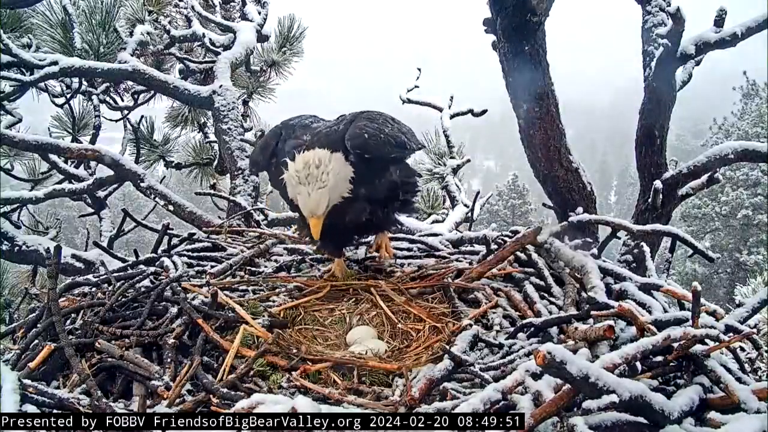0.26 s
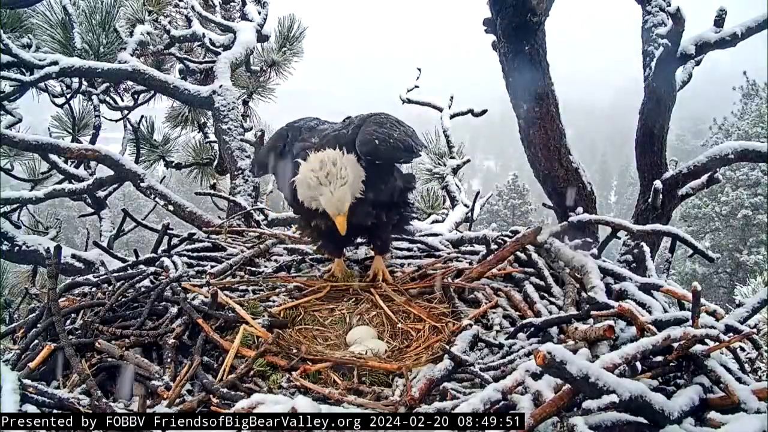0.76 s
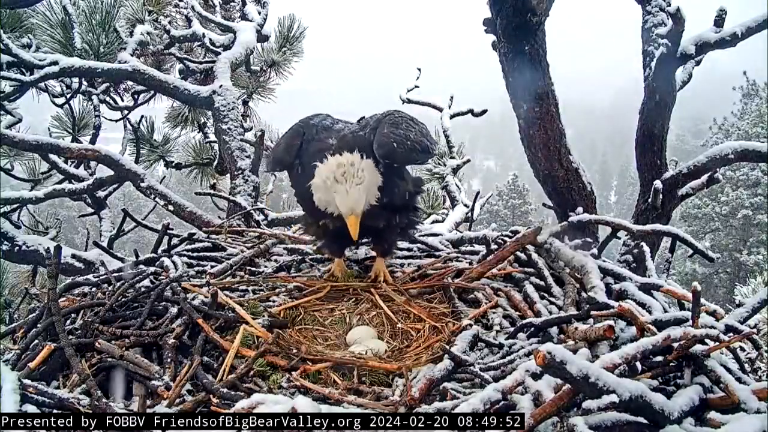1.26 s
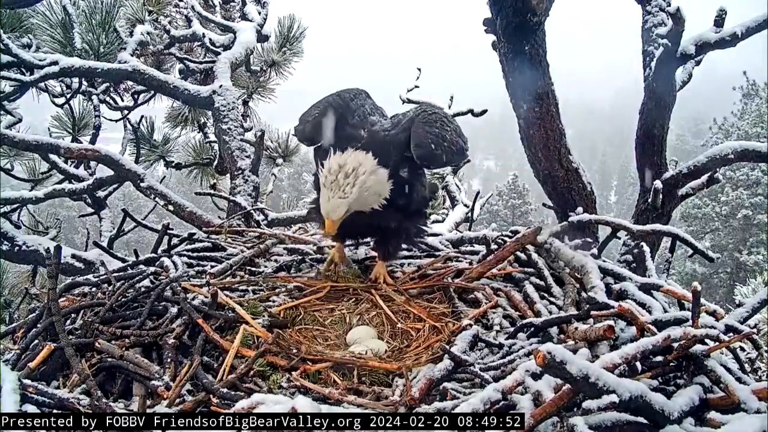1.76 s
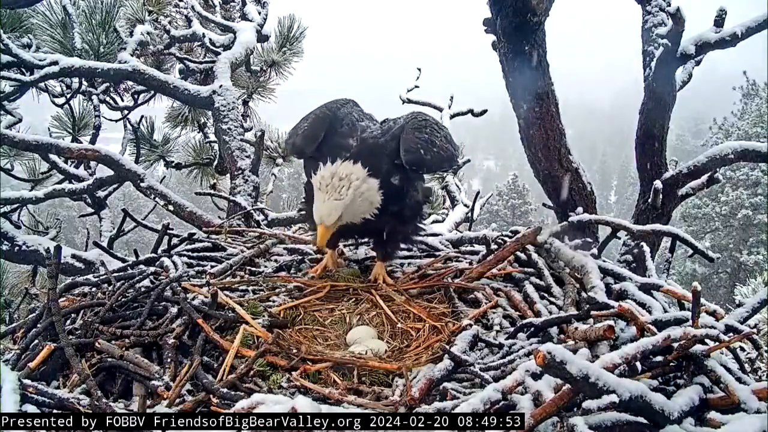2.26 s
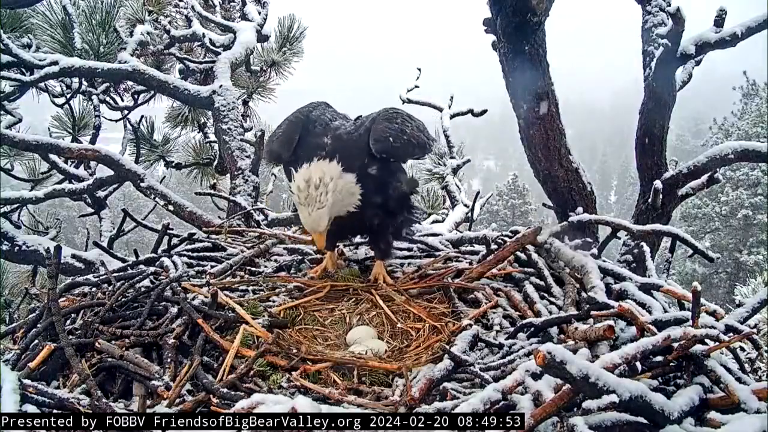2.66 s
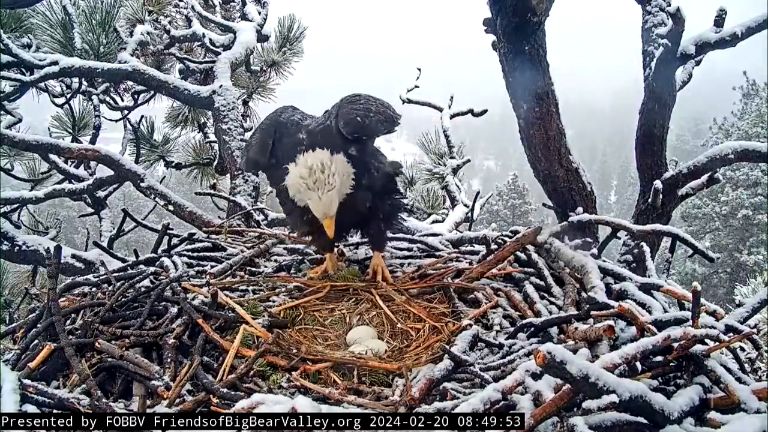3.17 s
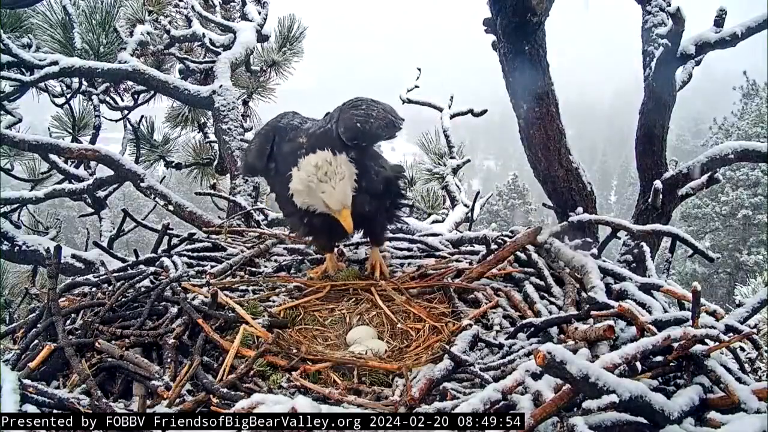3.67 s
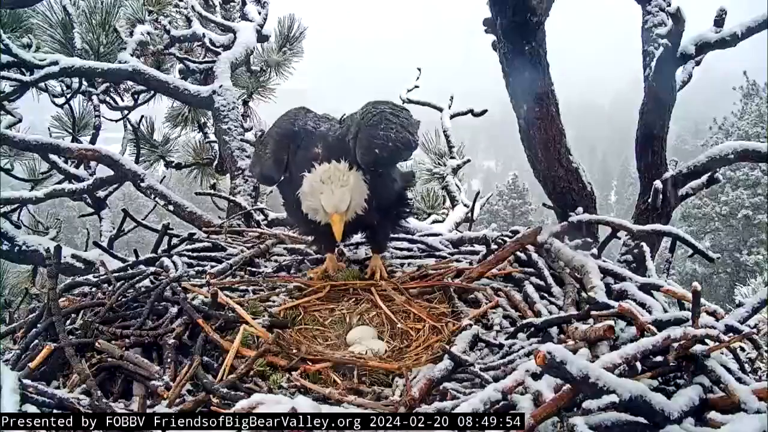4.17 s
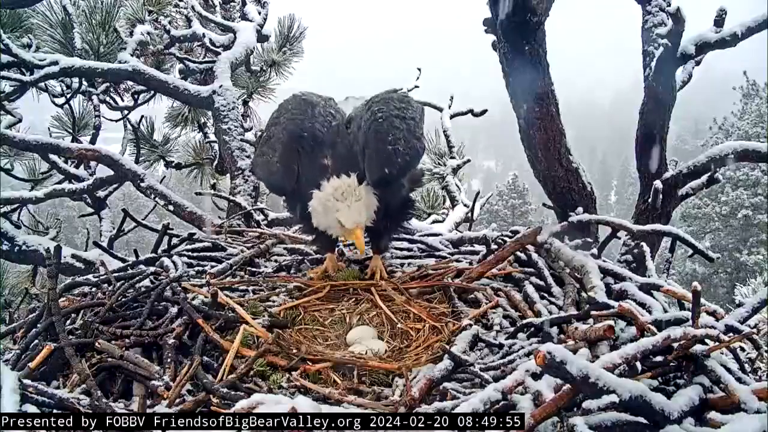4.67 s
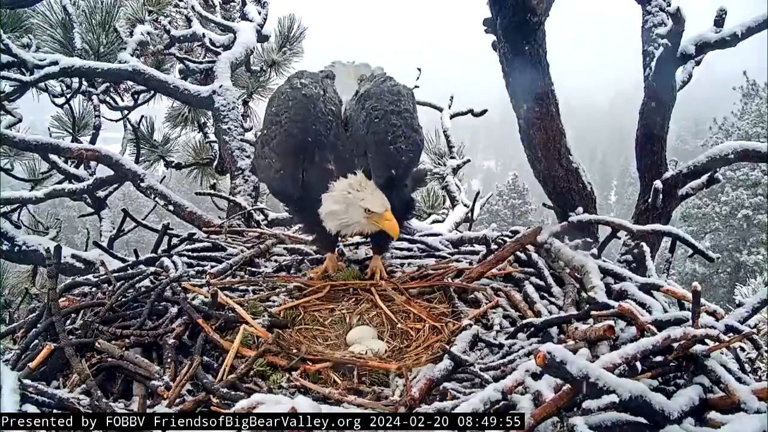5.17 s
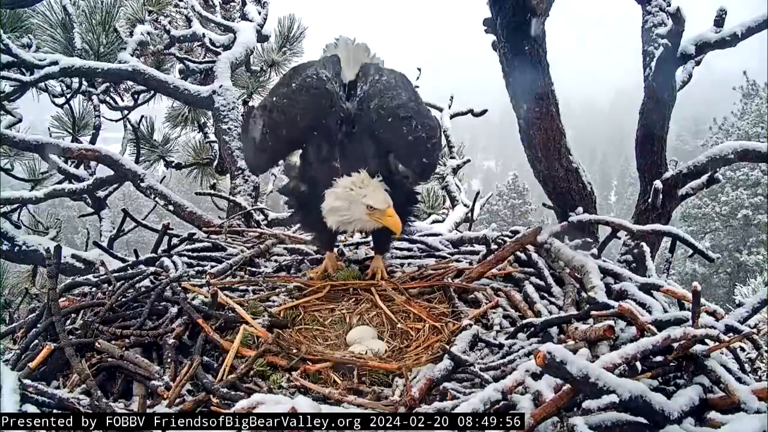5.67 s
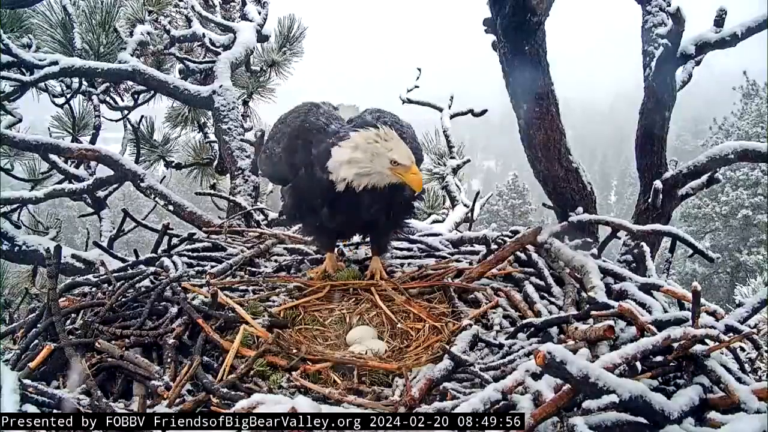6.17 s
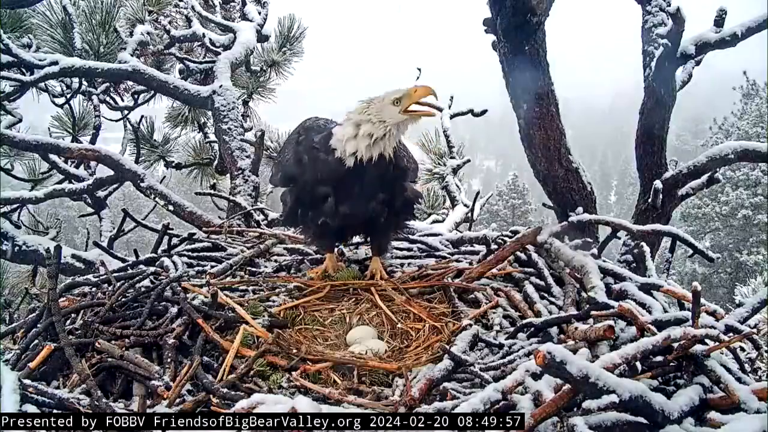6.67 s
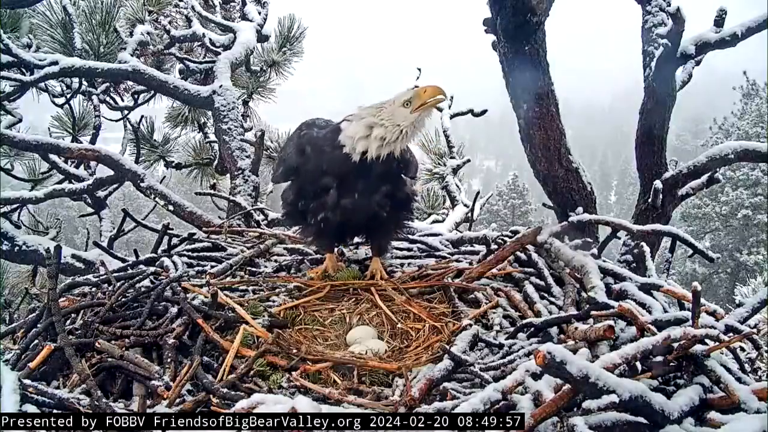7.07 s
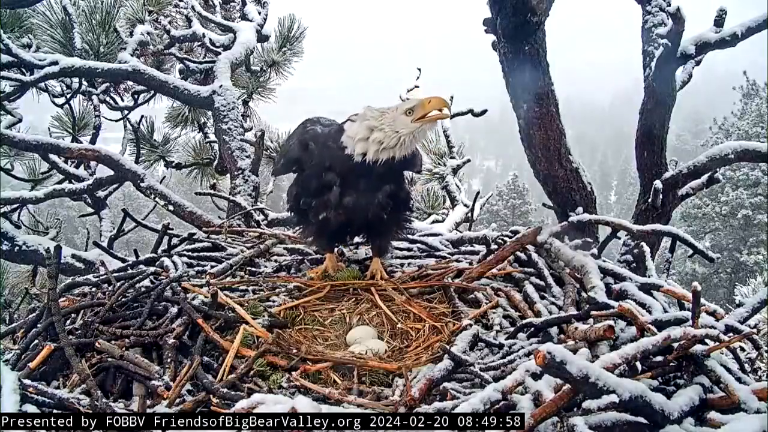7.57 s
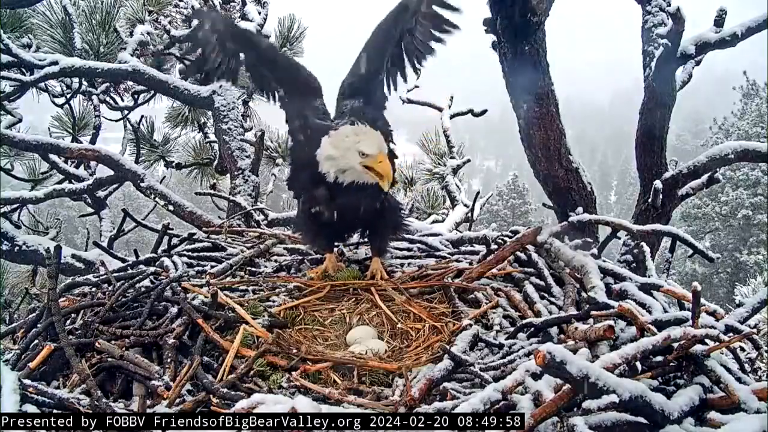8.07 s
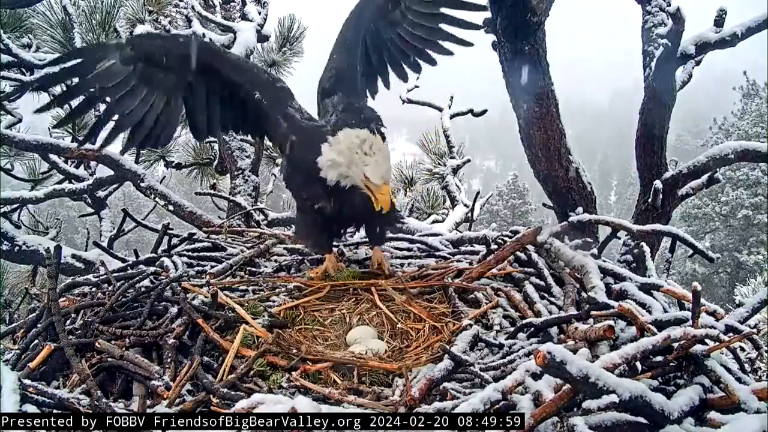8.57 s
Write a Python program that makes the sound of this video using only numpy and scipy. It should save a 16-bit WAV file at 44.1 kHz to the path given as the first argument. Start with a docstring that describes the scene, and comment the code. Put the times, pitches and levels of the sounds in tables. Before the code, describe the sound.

Over steady low wind rumble and hiss, a bald eagle gives faint chirps and a falling chitter, then bursts into harsh, cracking, overloaded yelps.

```python
"""On a nest in a snowy pine, a bald eagle gives thin chirps, a falling chitter and five loud, cracking yelps.
Its syrinx is a rough near-sine oscillator with strongly coloured overtones, and the forest answers by
scattering. Wind is coloured noise that rumbles, hisses and rushes, and twigs crunch as decaying bands of noise.
The yelps overload the nest microphone, whose gain control ducks the wind and lets it creep back."""
import sys
import numpy as np
from scipy import signal
from scipy.fft import rfft, irfft
from scipy.io import wavfile
from scipy.ndimage import uniform_filter1d, minimum_filter1d

SR = 44100
rng = np.random.default_rng(int(sys.argv[2]) if len(sys.argv) > 2 else 0)


def int16_out(signal):
    """Quantize to a 16-bit WAV file."""
    q = np.round(np.clip(np.atleast_2d(signal).T, -1, 1) * 32767)
    wavfile.write(sys.argv[1], SR, q.astype(np.int16))


N = 388516
TIME = np.arange(N) / SR  # s
AGE = np.arange(SR // 3) / SR  # time since the start of a note, s


def eagle():
    """Direct and scattered sound add: chirps carry much of the forest, whistle and yelps are nearly dry."""
    yelps = syrinx(forced_calls(), overtone_db=3.5, jitter=.065, buzz_hz=609, buzz_depth=1.05,
                   half_db=-1, fifth_db=-15, rasp_db=-3)
    chirps = syrinx(soft_calls(), overtone_db=-18, jitter=.062, buzz_hz=679, buzz_depth=1.3,
                    half_db=-11, fifth_db=-5, rasp_db=-4.5)
    whistle = syrinx([long_whistle()], overtone_db=-13, jitter=.04, buzz_hz=735, buzz_depth=.6,
                     half_db=-3.5, fifth_db=7, rasp_db=-10)
    direct = shrill(yelps, above_hz=10400, fold_db=13.5)
    direct += shrill(chirps, above_hz=9700, fold_db=6.5)
    direct += shrill(whistle, above_hz=8300, fold_db=9.0)
    tails = forest(chirps, scatter_db=-6.5, t60=0.8, echo_db=-30, echo_s=0.17)
    tails += forest(whistle + yelps, scatter_db=-19.5, t60=0.11, echo_db=-33.5, echo_s=0.27)
    return direct + tails


# Loud calls: a rough lead-in cracks into a held tone in another register.
# Each row: start in seconds, lead-in length in seconds, its start and end pitch in Hz, relative level in dB
# and roughness (0-1), held length in seconds, its start and end pitch in Hz, relative level in dB and
# roughness (0-1), final fade in dB.
YELPS = [ (6.746, 0.019, 1574, 1660, 3.5, 0.16, 0.034, 2470, 2690, 2.5, .07, 1.5),
         (8.229, 0.023, 1663, 1690, -1.5, 0.35, 0.052, 2250, 2295, 2.5, .06, -12),
         (8.347, .012, 3730, 3730, 2.5, 0.52, 0.035, 2915, 3050, 3.5, 0.11, -9),
         (8.457, .020, 4770, 3700, -3, 0.4, 0.052, 3090, 3050, 2, 0.17, -12),
         (8.634, 0.017, 3060, 3046, 0, 0.35, 0.039, 2310, 2410, 4, 0.23, -14)]
# Calls whose pitch arches into a thin top register.
# Each row: start in seconds, length in seconds, start, top and end pitch in Hz, relative level in dB,
# level change at the top in dB, roughness (0-1).
SQUEALS = [(0.546, .057, 5300, 7700, 5900, -34.5, -0.5, 0.54),
           (6.805, .054, 4360, 6660, 5900, -3.5, -15, 0.6)]
# Short loud notes around the yelps, shaped like chirps.
# Each row: start in seconds, length in seconds, start and end pitch in Hz, relative peak level in dB,
# roughness (0-1).
SQUAWKS = [ (6.792, 0.02, 3190, 3080, -2.5, .2), (6.847, .013, 6780, 5700, -18, 0.5),
           (6.853, 0.032, 5560, 5370, -11, 0.88), (8.317, .020, 3250, 4750, -10, .25),
           (8.325, .016, 5150, 5450, -11, .35), (8.332, 0.014, 4360, 4160, -4, 0.26),
           (8.618, 0.026, 3130, 3700, -13.5, 0.42)]


def forced_calls():
    """Strongly driven phonation: the yelps, squeals and squawks as notes for the syrinx."""
    notes = [yelp(*row) for row in YELPS]
    notes += [squeal(*row) for row in SQUEALS]
    return notes + [chirp(*row) for row in SQUAWKS]


def yelp(s, lead_s, lead_hz, lead_end_hz, lead_db, lead_rough,
         held_s, held_hz, held_end_hz, held_db, held_rough, fade_db):
    """Register change: the lead-in leaps to the held tone, which glides and then fades to a tail."""
    leap_s = .002
    fade_s, tail_s, tail_loss_db = 0.03, 0.0096, 3  # the fade's start and end are counted back from the end
    length = lead_s + held_s
    stages = [0, lead_s, lead_s + leap_s, length]
    # the voice is rough and weak around its onset and the change of register
    crack_s, crack_rough, crack_db = 0.0048, 0.13, -5
    crack = np.exp(-AGE / crack_s) + np.exp(-np.abs(AGE - lead_s) / crack_s)
    fade = np.interp(AGE, [length - fade_s, length - tail_s, length], [0, fade_db, fade_db - tail_loss_db])
    hz = np.interp(AGE, stages, [lead_hz, lead_end_hz, held_hz, held_end_hz])
    db = np.interp(AGE, stages, [lead_db, lead_db, held_db, held_db]) + crack_db * crack + fade
    rough = np.interp(AGE, stages, [lead_rough, lead_rough, held_rough, held_rough])
    return note(s, length, hz, db, rough + crack_rough * crack)


def squeal(s, length, start_hz, top_hz, end_hz, db, top_db, rough):
    """Frequency modulation along a flat-topped arch; the voice thins and clears towards the top."""
    arch_power, top_rough = 2.5, 0.15  # flatness of the arch; roughness left at its top
    edge = off_centre(length)
    foot_hz = np.where(AGE < length / 2, start_hz, end_hz)
    hz = top_hz + (foot_hz - top_hz) * edge ** arch_power
    return note(s, length, hz, db + top_db * (1 - edge ** 2), top_rough + (rough - top_rough) * edge)


# Soft notes; some overlap, with a lower partial sounding beneath the main one.
# Each row: start in seconds, length in seconds, start and end pitch in Hz, relative peak level in dB,
# roughness (0-1).
CHIRPS = [ (.505, 0.029, 3950, 4180, -21, 0.24), (0.593, 0.066, 4950, 4600, -36, .8),
          (0.893, 0.035, 3240, 3310, -22, .03), (2.854, 0.022, 4400, 4280, -25, .25),
          (2.87, 0.025, 4240, 4300, -15, 0.05), (2.895, 0.022, 4200, 4130, -11.5, 0),
          (3.267, 0.019, 4420, 4440, -20, 0.22), (3.289, 0.037, 4520, 3950, -25, 0.1),
          (3.393, 0.023, 5450, 5130, -31, .25), (3.402, 0.032, 4260, 4140, -18, 0.15),
          (3.428, 0.02, 4520, 4300, -25, 0.1), (3.532, 0.045, 4170, 3880, -26.5, .3),
          (3.535, 0.033, 3400, 3270, -28, .12), (3.717, 0.047, 3920, 3870, -32.5, 0.48),
          (3.719, 0.022, 3220, 3190, -29, 0.2), (3.744, 0.029, 3200, 3180, -35, 0.3),
          (3.810, .026, 3180, 3140, -41, .15), (3.940, .040, 2900, 2860, -40, 0.4),
          (4.010, .060, 2880, 2850, -44, .35)]
# Steep downward flicks in the chitter, each followed by a faint high squeak.
# Each row: start in seconds, start pitch in Hz, relative peak level in dB.
FLICKS = [(2.933, 7300, -27.5), (3.032, 6800, -27), (3.139, 6100, -27.5)]


def soft_calls():
    """Gently driven phonation: the chirps and the flicks of the chitter as notes for the syrinx."""
    notes = [chirp(*row) for row in CHIRPS]
    for row in FLICKS:
        notes += flick(*row)
    return notes


def chirp(s, length, start_hz, end_hz, db, rough):
    """A linear frequency glide, loudest and cleanest in the middle."""
    edge = off_centre(length) ** 2
    hz = np.interp(AGE, [0, length], [start_hz, end_hz])
    return note(s, length, hz, db - 15 * edge, rough + 0.14 * edge)


def flick(s, start_hz, db):
    """Two successive glides: a steep fall and the fainter squeak after it."""
    fall_s = 0.024
    return [chirp(s, fall_s, start_hz, end_hz=4250, db=db, rough=0.79),
            chirp(s + fall_s, 0.033, start_hz=7200, end_hz=6400, db=db - 13, rough=.45)]


# The contour of a close, wavering whistle.
# Each row: time in seconds, pitch in Hz, relative level in dB.
WHISTLE = [(5.575, 4560, -33), (5.609, 4708, -20.5), (5.627, 5090, -30), (5.685, 5070, -28),
           (5.705, 5330, -24.5), (5.745, 5430, -19), (5.757, 5340, -32), (5.767, 4570, -15),
           (5.777, 4450, -25), (5.787, 4520, -19), (5.795, 4785, -28), (5.807, 4630, -27),
           (5.815, 4600, -38)]
# Roughness of the whistle, clearing as it reaches its highest pitch.
# Each row: pitch in Hz, roughness (0-1).
WHISTLE_ROUGH = [(4500, 0.14), (5100, 0.8), (5300, 0.02)]


def long_whistle():
    """Continuous frequency modulation: one drawn-out note whose roughness follows its pitch."""
    s, hz, db = np.transpose(WHISTLE)
    hz, db = np.interp(s[0] + AGE, s, hz), np.interp(s[0] + AGE, s, db)
    rough = np.interp(hz, *np.transpose(WHISTLE_ROUGH))
    return note(s[0], s[-1] - s[0], hz, db, rough)


def note(s, length, hz, db, rough):
    """Amplitude envelope: start time, then pitch, amplitude and roughness over AGE, with short ramps."""
    gate = np.clip(np.minimum(AGE, length - AGE) / .003, 0, 1)  # opens and closes within 3 ms
    return s, hz, gate * from_db(db), np.clip(rough, 0, 1)


def off_centre(length):
    """Normalised distance from the middle of a note: 0 there, 1 at both ends."""
    return np.minimum(np.abs(2 * AGE / length - 1), 1)


# Colour of the overtones: strength of each partial by the frequency where it falls. # Each row: frequency in
# Hz, relative level in dB.
OVERTONE_COLOUR = [(3200, -74), (4650, -9), (5000, -24), (6100, -30), (6700, -15.5), (7700, -21.5), (9100, -21),
                   (10300, -34), (11500, -31.5), (13500, -35), (15400, -37)]
# Colour of the noise in the voice, also mixed into the rushes of wind.
# Each row: frequency in Hz, relative level in dB per Hz.
RASP = [(150, -53), (1800, 20), (3500, 5.5), (5500, 6.5), (8000, -21), (11000, -8.5), (15000, -15)]


def syrinx(notes, overtone_db, jitter, buzz_hz, buzz_depth, half_db, fifth_db, rasp_db):
    """Nonlinear oscillation: a near sine that, when rough, trembles, doubles its period, buzzes and hisses."""
    starts, hz, level, rough = map(np.array, zip(*notes))
    trembling_hz = hz * (1 + jitter * rough * flutter(470, hz.shape))
    phase = 2 * np.pi * np.cumsum(trembling_hz, axis=1) / SR
    colour_hz, colour_db = np.transpose(OVERTONE_COLOUR)

    def overtone(multiple):
        """Colouring: one partial, weighted by the frequency where it falls."""
        gain = from_db(np.interp(multiple * hz, colour_hz, colour_db, right=-120))
        return gain * np.sin(multiple * phase)

    # overtones fade with the effort, on top of the fading of the whole note
    effort = (level / level.max()) ** 0.78
    tone = np.sin(phase) + from_db(overtone_db) * effort * sum(overtone(k) for k in range(2, 6))
    # period doubling adds partials at 1/2 and 3/2 of the pitch
    tone += from_db(half_db) * rough ** 2 * np.sin(phase / 2)
    tone += from_db(fifth_db) * rough * overtone(1.5)
    # a slower second vibration chops the tone and puts partials on both sides of it
    wavering_hz = buzz_hz * (1 + 0.15 * flutter(115.0, hz.shape))
    buzz = np.sin(2 * np.pi * np.cumsum(wavering_hz, axis=1) / SR)
    depth = buzz_depth * rough
    tone *= (1 + depth * buzz) / np.sqrt(1 + depth ** 2 / 2)
    catching = from_db(4 * rough * flutter(200, hz.shape))  # the level breaks up when rough
    rasp = from_db(rasp_db) * (rough + 0.023) * noise(RASP, hz.shape)
    return place(starts, level * catching * (np.sqrt(2) * tone + rasp))


def place(starts, sounds):
    """Superposition: lay each sound at its start time and add."""
    out = np.zeros(N + SR)
    for s, sound in zip(starts, sounds):
        first = int(s * SR)
        out[first:first + len(sound)] += sound
    return out[:N]


# Mirror lines: a treble partial at frequency f also sounds at the mirror frequency minus f.
# Each row: mirror frequency in Hz, relative level in dB.
MIRRORS = [(24000, 0), (20100, -11)]


def shrill(x, above_hz, fold_db):
    """Spectral folding: the converter mirrors high overtones into inharmonic treble lines."""
    high = signal.hilbert(butter(x, above_hz, "high", order=3))
    mirror = sum(from_db(db) * np.exp(-2j * np.pi * hz * TIME) for hz, db in MIRRORS)
    return x + from_db(fold_db) * np.real(high * mirror)


def forest(x, scatter_db, t60, echo_db, echo_s):
    """Scattering: trunks return a thin, dull tail, and a far stand of trees one blurred echo."""
    t = TIME[:SR]
    scatter = from_db(-60 * t / t60) * (t > .008)
    echo = np.exp(-((t - echo_s) / 0.11) ** 2)
    shape = from_db(scatter_db) * rms_one(scatter) + from_db(echo_db) * rms_one(echo)
    response = butter(shape * rng.standard_normal(SR) / np.sqrt(SR), 5500, "low")
    return signal.fftconvolve(x, response)[:N]


# Twigs shifting in the nest.
# Each row: start in seconds, relative level in dB, time to decay by 60 dB in seconds, centre in Hz.
TWIGS = [(5.503, -10, 0.027, 1260), (6.162, -11, 0.066, 1700), (6.164, -35, 0.15, 4240),
         (7.695, -33, 0.025, 6870)]


def twigs():
    """Damped impact noise: each twig gives a short, broad, decaying crunch."""
    out = np.zeros(N)
    for s, db, t60, hz in TWIGS:
        decay = (TIME >= s) * from_db(db - 60 * np.abs(TIME - s) / t60)
        crunch = rng.standard_normal(N) * decay
        out += butter(crunch, [hz / 1.5, hz * 1.16], "band") * np.sqrt(SR / (2 * hz))
    return out


# Colour of the wind. Each row: frequency in Hz, relative level in dB per Hz.
WIND = [(12, -25), (28, -8), (55, 2.5), (85, -2.5), (170, -17), (320, -20), (550, -23), (1300, -23),
        (1900, -18), (2800, -42), (3800, -47), (4900, -39), (7000, -54), (9300, -62.5), (12300, -54),
        (13200, -62), (14000, -83)]
# Gruff rushes of noise around the close calls.
# Each row: centre time in seconds, half length in seconds, relative level in dB.
RUSHES = [(5.777, 0.011, 7.5), (6.745, 0.0039, 15.5), (6.849, 0.0048, 20.5), (6.9, 0.029, 26),
          (8.233, 0.0069, 15), (8.335, 0.028, 8), (8.469, 0.0057, 14), (8.655, 0.024, 12.5)]


def wind():
    """Turbulence noise: steady rumble and hiss, with short sputtering rushes of similar colour."""
    steady = from_db(-16.5 + .5 * flutter(3)) * noise(WIND)
    swell = sum(from_db(db) * np.exp(-((TIME - s) / half) ** 2) for s, half, db in RUSHES)
    sputter = from_db(2.9 * flutter(270))
    rush = butter(noise(WIND), 134, "high", order=1) + from_db(-20) * noise(RASP)
    return steady + from_db(-20) * swell * sputter * rush


def noise(spectrum, size=(N,)):
    """Spectral shaping: random noise with the given colour, scaled to rms 1."""
    hz, db = np.transpose(spectrum)
    bins = np.maximum(np.fft.rfftfreq(size[-1], 1 / SR), 1)
    colour = from_db(np.interp(np.log(bins), np.log(hz), db))
    return rms_one(irfft(rfft(rng.standard_normal(size)) * colour, size[-1]))


def flutter(rate_hz, size=(N,)):
    """Band-limited fluctuation: random wobble up to about the given rate, scaled to rms 1."""
    return rms_one(butter(rng.standard_normal(size), rate_hz, "low"))


def butter(x, hz, kind, order=2):
    """Maximally flat filtering: low, high or band pass."""
    sos = signal.butter(order, np.clip(hz, 10, .45 * SR), kind, fs=SR, output="sos")
    return signal.sosfilt(sos, x)


def rms_one(x):
    """Power normalisation to rms 1."""
    return x / np.sqrt(np.mean(x ** 2) + 1e-20)


def from_db(db):
    """Logarithmic level in dB to amplitude ratio."""
    return 10 ** (np.asarray(db) / 20)


def scene():
    """Superposition at one microphone, which feeds both channels."""
    return np.tile(eagle() + twigs() + wind(), (2, 1))


def gain_control(x, limit_db, hold_s, release_db_per_s, attack_s):
    """Level compression: gain falls quickly when the level passes the limit, waits, then creeps back."""
    level_db = 10 * np.log10(np.maximum(uniform_filter1d(x ** 2, size=256), 1e-12))
    over = np.maximum(level_db - limit_db, 0)
    span = 2 * int(hold_s * SR / 2) + 1
    held = -minimum_filter1d(-over, span, origin=span // 2, mode="constant")  # running maximum
    # adding the release slope lets a running maximum trace the straight recovery
    recovery = release_db_per_s * TIME
    cut_db = np.maximum.accumulate(held + recovery) - recovery
    r = np.exp(-1 / (attack_s * SR))
    return from_db(-signal.lfilter([1 - r], [1, -r], cut_db))


def record(dry):
    """Compression and overload: the gain ducks, remaining peaks clip, and a steep filter cuts the top."""
    gain = gain_control(dry[0], limit_db=-6.5, hold_s=0.18, release_db_per_s=8.0, attack_s=0.0024)
    clipped = np.clip(dry * gain, -.95, .95)
    top_cut = signal.ellip(10, .2, 80, 15400, fs=SR, output="sos")  # order, ripple dB, rejection dB, Hz
    return signal.sosfilt(top_cut, clipped)


dry = scene()
out = record(dry)
int16_out(out)
```